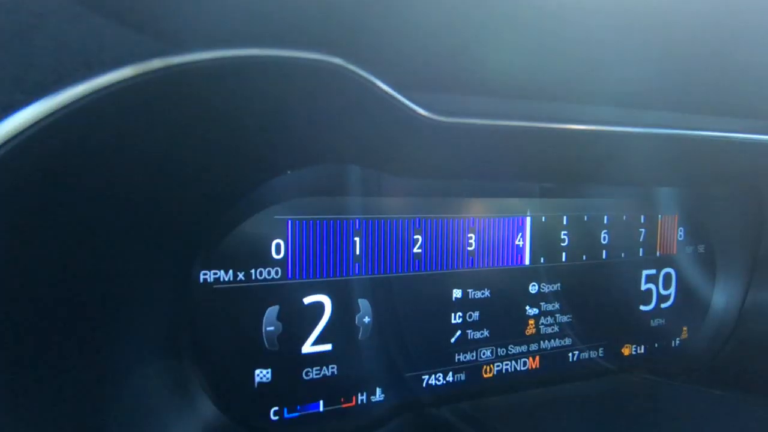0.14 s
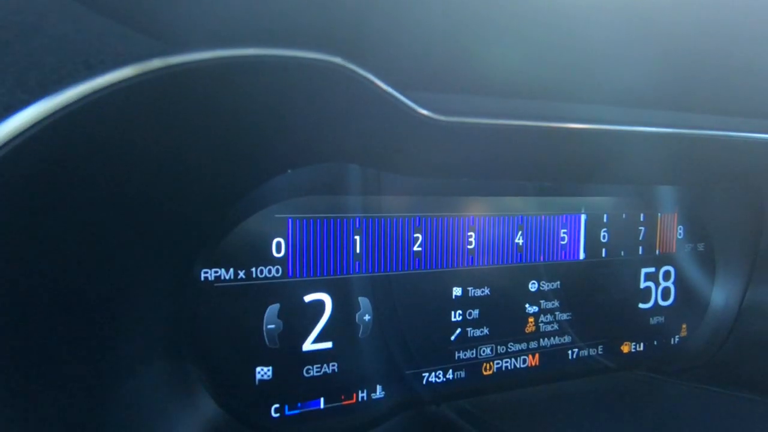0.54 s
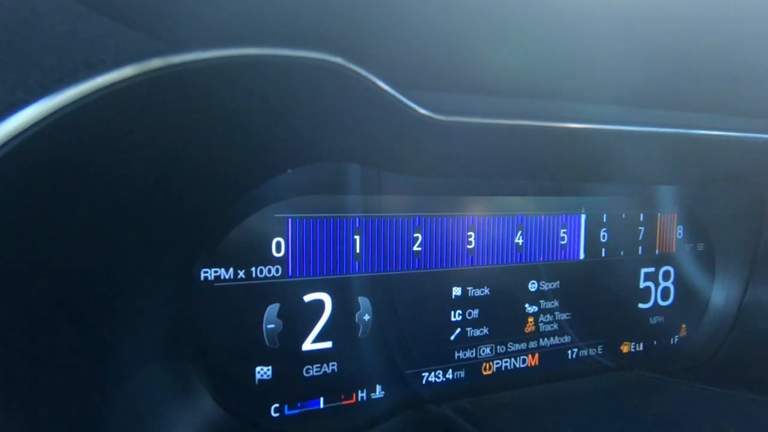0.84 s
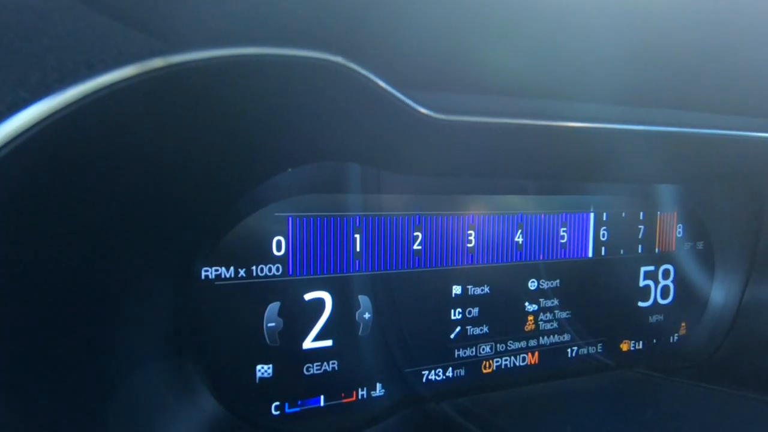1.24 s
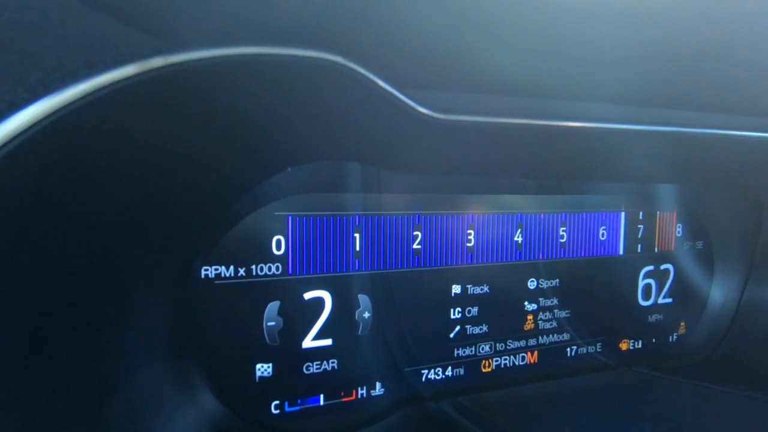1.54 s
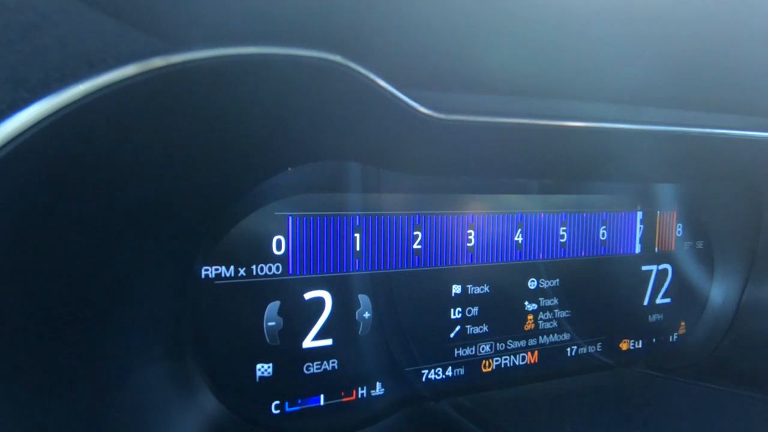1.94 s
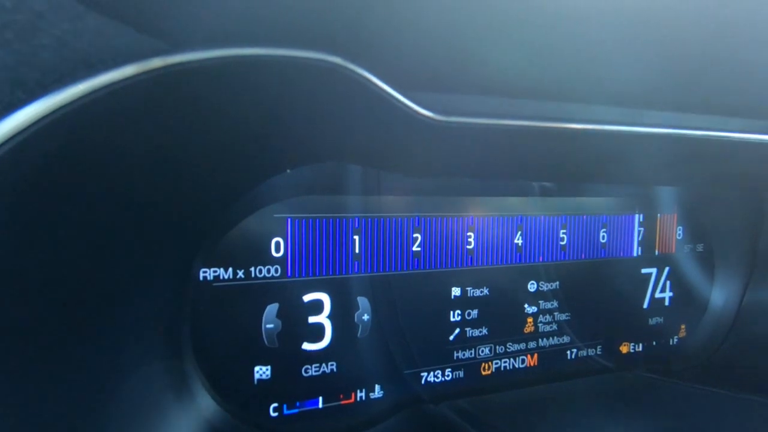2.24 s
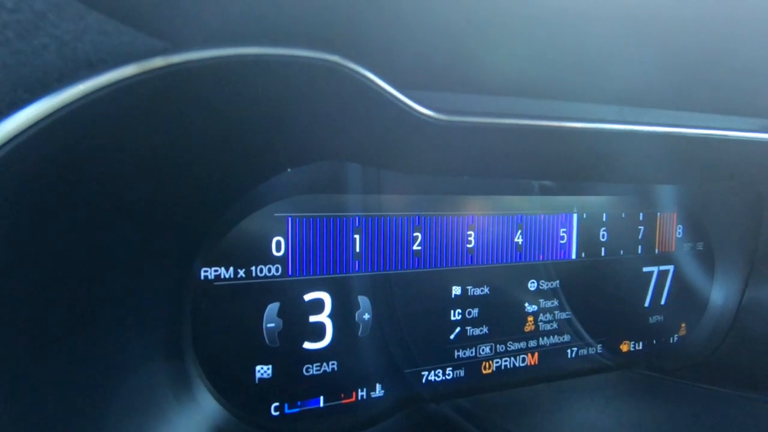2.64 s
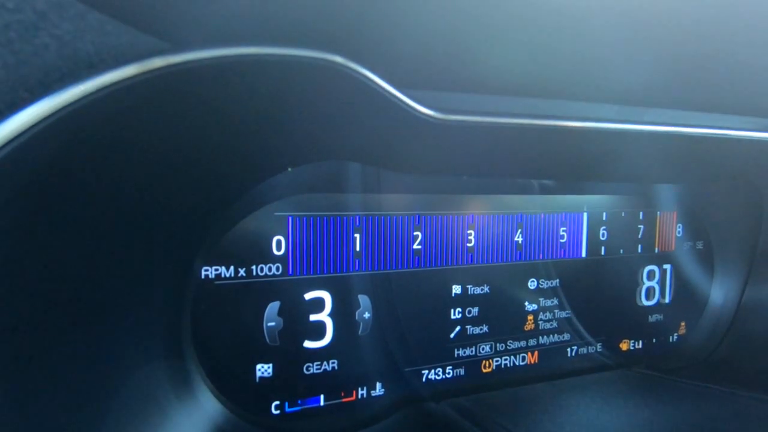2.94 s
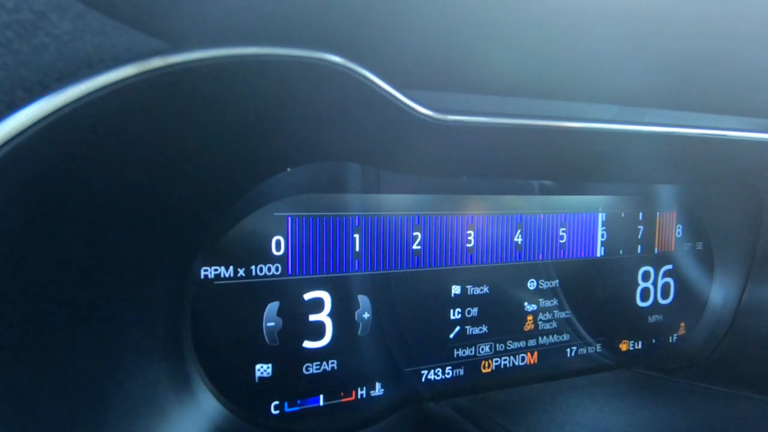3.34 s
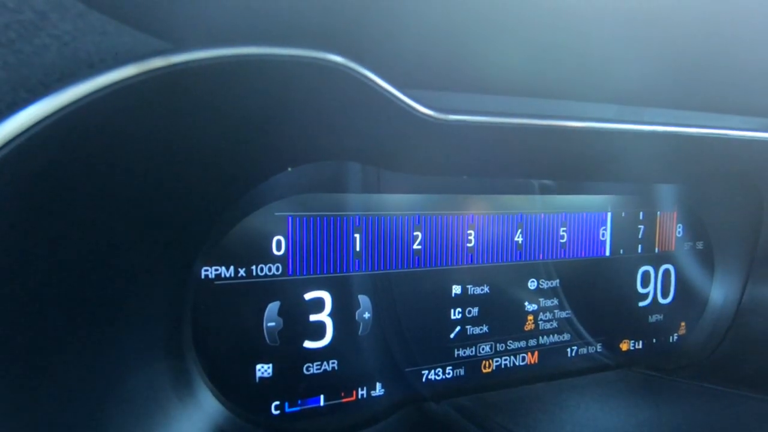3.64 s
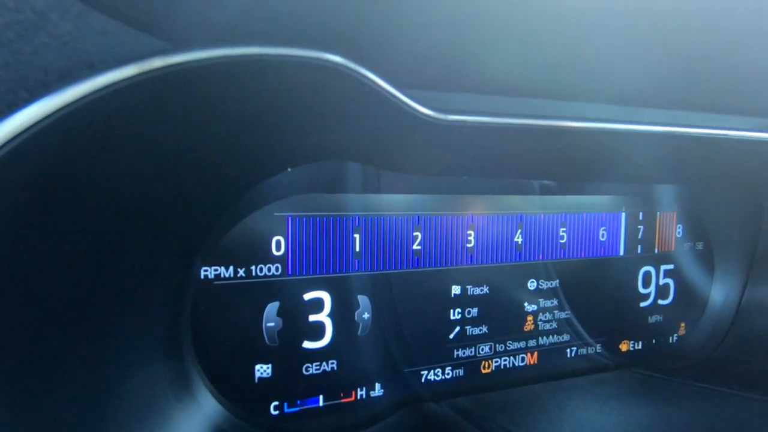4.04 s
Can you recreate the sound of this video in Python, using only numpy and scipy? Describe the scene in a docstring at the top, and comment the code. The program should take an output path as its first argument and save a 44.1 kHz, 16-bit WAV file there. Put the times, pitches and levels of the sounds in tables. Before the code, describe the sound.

A loud supercharged V8 is heard from inside the cabin of a moving car. It opens with a quick, ragged downshift blip, with a low bump and air thumps that overload the microphone. From about 0.3 seconds the engine eases to a softer, level drone. Around 0.8 seconds the throttle opens, and the deep, uneven exhaust note hardens and climbs, with a gassy rasp and a faint supercharger whine. It booms near 1.4 seconds and holds at its highest pitch from 1.6 to 2.1 seconds. At about 2.2 seconds a rough upshift drops the pitch. From 2.5 seconds the engine pulls again, slightly less raspy, rising slowly until the end just past 4 seconds. Tyre rumble and low buffeting air run underneath, with brief overload pops around 2, 2.5, 3.5 and 4 seconds.

```python
"""Inside a car's cabin, the microphone riding along with a supercharged V8: a downshift blip, a moment
on light throttle, a hard pull in second, an upshift, a pull in third. The uneven beat of the two
exhaust banks drones through the body, gas rasps with every pulse and the blower whines.
Road rumble and buffeting air lie underneath and drive the microphone into overload."""
import sys
import numpy as np
from scipy import signal
from scipy.fft import rfft, irfft
from scipy.io import wavfile
from scipy.ndimage import uniform_filter1d

SR = 44100
rng = np.random.default_rng(int(sys.argv[2]) if len(sys.argv) > 2 else 0)


def persist_wave(psi):
    """Save psi, clipped to +-1, as 16-bit WAV."""
    counts = np.round(np.clip(psi, -1, 1) * 32767).astype(np.int16)
    wavfile.write(sys.argv[1], SR, np.atleast_2d(counts).T)


N = 184368

# air buffets that pin the microphone: centre_s, length_s, depth (0-1)
MIC_BUFFETS = [(0.043, 0.021, 0.82), (0.084, 0.0082, 0.73), (1.906, 0.0026, 1), (2.171, 0.0048, .7),
               (2.49, .006, 0.62), (3.496, 0.0057, 0.8), (3.51, 0.0038, 1), (4.004, 0.0058, 0.56),
               (4.145, 0.0086, 0.94), (4.16, 0.0026, 0.98)]


def from_db(db):
    """Decibels to gain."""
    return 10 ** (np.asarray(db) / 20)


def rms_one(x):
    """Scale to unit power."""
    return x / np.sqrt(np.mean(x ** 2) + 1e-20)


def in_time(rows):
    """A curve of (time_s, value) points, sample by sample."""
    return np.interp(np.arange(N) / SR, *np.transpose(rows))


def swells(rows):
    """Each height column of (centre_s, length_s, heights...) events as a sum of smooth bumps."""
    t = np.arange(N) / SR
    return sum(np.outer(heights, np.exp(-(2 * (t - centre_s) / length_s) ** 2))
               for centre_s, length_s, *heights in rows)


def at_hz(spectrum, hz):
    """A spectrum's level in dB, interpolated on a log-frequency axis."""
    points_hz, levels_db = np.transpose(spectrum)
    return np.interp(np.log(hz), np.log(points_hz), levels_db)


def coloured(x, spectrum):
    """Give a signal a spectrum that falls steeply above its last point; unit power."""
    hz = np.maximum(np.arange(N // 2 + 1) * SR / N, 1)
    skirt = np.minimum(1, spectrum[-1][0] / hz) ** 4
    return rms_one(irfft(rfft(x) * from_db(at_hz(spectrum, hz)) * skirt, N))


def drift(rate_hz, hop=40):
    """A slow random wander with spread 1."""
    pole = np.exp(-2 * np.pi * rate_hz * hop / SR)
    noise = rng.standard_normal(N // hop + 2002)
    slow = signal.lfilter([1], [1, -2 * pole, pole * pole], noise)[2000:]
    return np.interp(np.arange(N) / hop, np.arange(len(slow)), rms_one(slow))


def order_tone(cycles, order, scatter=1):
    """One multiple of the cycle rate, its timing scattered by up to a share of its period."""
    return np.sin(2 * np.pi * (order * cycles + scatter * rng.random()))


def peak_db(hz, centre_hz, half_width_hz, boost_db):
    """What a resonance adds to a tone that passes through it."""
    return boost_db / (1 + np.square((hz - centre_hz) / half_width_hz))


def throttled(throttle, open_db, drop_db, bend):
    """Level of a layer as the throttle closes; the larger the bend, the longer it holds."""
    return open_db - drop_db * (1 - throttle) ** bend


def rumbling(spectrum):
    """Low noise whose slow swells are evened out."""
    noise = coloured(rng.standard_normal(N), spectrum)
    return noise / np.sqrt(uniform_filter1d(noise ** 2, size=6000))


def exhaust(cycles, cycle_hz, throttle, load, rough, sag_db, split_hz=340, pipe_lag_cycles=0.067):
    """The two banks through the body: a low drone and a higher bark, swelling at each resonance."""
    # the banks' uneven beat: order (multiple of the cycle rate), light_db, loaded_db
    bank_orders = [(1, -26.5, -34), (2, -36, -41), (3, -35.5, -35), (4, -41.5, -34.5), (5, -32.5, -40),
                   (6, -35, -37.5), (7, -54, -35), (8, -31, -34), (9, -39.5, -36.5), (10, -31, -33),
                   (11, -38.5, -39.5), (12, -41, -44.5), (13, -36.5, -44), (14, -33.5, -37),
                   (15, -32.5, -38), (16, -44.5, -40)]
    # pipe and cabin resonances: centre_hz, half_width_hz, boost_db
    resonances = [(116.7, 20.9, 18.5), (166.7, 15.2, 9), (252.7, 45.9, 18.5), (335.6, 33, 12.5),
                  (369, 13, -4.5), (421.7, 14.8, 8.5), (484.7, 19.6, 7.5), (531.4, 7.7, 7.5),
                  (579, 22, 6.5), (677, 37, 7), (786, 20, 7.5)]
    # one narrow resonance booms as the throttle comes wide open: centre_s, length_s, boost_db
    boom = [(1.4, 1, 15)]
    boom_db, = swells(boom)
    drone_db = throttled(throttle, open_db=1.46, drop_db=11.5, bend=4.3) + sag_db
    bark_db = throttled(throttle, open_db=0.08, drop_db=12.5, bend=2.25)
    out = 0
    for order, light_db, loaded_db in bank_orders:
        hz = order * cycle_hz
        low = 1 / (1 + (hz / split_hz) ** 12)
        level_db = (1 - load) * light_db + load * loaded_db + low * drone_db + (1 - low) * bark_db
        body_db = sum(peak_db(hz, *row) for row in resonances)
        body_db += peak_db(hz, centre_hz=404.5, half_width_hz=5.3, boost_db=boom_db)
        # the pipes smear each beat: every order arrives later than the one below
        timing = cycles - pipe_lag_cycles * order
        # uneven combustion shakes each order in timing and strength
        timing += 0.076 * rough * drift(13) / order
        uneven_db = 4 * rough * drift(11.8) + load * drift(2.7)
        out += from_db(level_db + body_db + uneven_db) * order_tone(timing, order, scatter=0.36)
    return np.sqrt(2) * out


def pulse_edge(cycles, cycle_hz, throttle, load, trim_db, uneven_db=4.5):
    """The sharp fronts of the exhaust pulses add weak, restless upper orders."""
    # their spectrum on light throttle and under load: frequency_hz, relative_db
    light_spectrum = [(700, 3.5), (900, 2.5), (1020, -11.5), (1110, 3), (1190, -23.5), (1300, -5),
                      (1480, -15.5), (1650, -11), (1900, -18), (2010, -14), (2130, -15.5), (3000, -30)]
    loaded_spectrum = [(650, 0.5), (810, 8), (960, -4.5), (1150, -6), (1300, -1.5), (1480, -10.5),
                       (2100, -18), (3600, -31)]
    out = 0
    for order in range(17, 58):
        hz = order * cycle_hz
        level_db = (1 - load) * at_hz(light_spectrum, hz) + load * at_hz(loaded_spectrum, hz)
        smear = 0.048 * load * drift(25) / order   # hard firing blurs the tones
        out += from_db(level_db + uneven_db * drift(2.93)) * order_tone(cycles + smear, order)
    edge_db = throttled(throttle, open_db=-26, drop_db=16, bend=1.1) + trim_db - 2.5 * load
    return from_db(edge_db) * rms_one(out)


def turbulence(pulses, spectrum, depth):
    """Gas noise that swells on each pressure peak."""
    return coloured(rng.standard_normal(N) * np.exp(depth * np.tanh(pulses)), spectrum)


def exhaust_gas(pipes, throttle, rough, treble_db):
    """Gas rushes out with every pulse: a low roar, a rasp above it and a hiss on top."""
    # the three noise colours: frequency_hz, relative_db
    roar_spectrum = [(70, -26), (110, -3), (250, 0), (450, -5), (650, -10), (850, -15), (1050, -18),
                     (1400, -23.5)]
    rasp_spectrum = [(600, -14), (900, 2.5), (1300, 1), (1600, -4.5), (2200, -4.5), (3200, -9),
                     (4200, -16.5), (6000, -44.5)]
    hiss_spectrum = [(2500, 0), (4000, 1), (6000, -3.5), (8000, -7), (9500, -9.5), (11000, -15),
                     (13000, -20.5), (15500, -26)]
    pulses = pipes / np.sqrt(uniform_filter1d(pipes ** 2, size=4410))
    roar_db = throttled(throttle, open_db=-25.5, drop_db=13, bend=4.8) + 7.3 * rough
    rasp_db = throttled(throttle, open_db=-33.5, drop_db=21.5, bend=1.13) + treble_db
    hiss_db = throttled(throttle, open_db=-41.5, drop_db=23.5, bend=1.28) + treble_db
    roar = from_db(roar_db) * turbulence(pulses, roar_spectrum, depth=0.79)
    rasp = from_db(rasp_db) * turbulence(pulses, rasp_spectrum, depth=0.64)
    hiss = from_db(hiss_db) * turbulence(pulses, hiss_spectrum, depth=0.22)
    return roar + rasp + hiss


def blower(cycles, cycle_hz, load, order=18.55, octave_db=-5, flutter_db=3):
    """Belt-driven rotor lobes chop the intake air into a whine that grows with load and speed."""
    level_db = -46 - 14.5 * (1 - load) + 15 * np.log2(cycle_hz / 50)
    intake_db = peak_db(order * cycle_hz, centre_hz=1008, half_width_hz=9.6, boost_db=13.5)
    # the intake resonance builds up only where the speed dwells on it
    flare_db = uniform_filter1d(intake_db, size=6000)
    whine = order_tone(cycles, order) + from_db(octave_db) * order_tone(cycles, 2 * order)
    return np.sqrt(2) * from_db(level_db + flare_db + flutter_db * drift(15)) * whine


def road_and_air(throttle, air_db=-21.5, rise_db_per_s=0.9):
    """Tyre rumble, growing with the drive and as the car gathers speed, and air at the microphone."""
    # the two noise colours: frequency_hz, relative_db
    tyre_spectrum = [(22, -6), (35, -13.5), (58, 0.5), (78, -7.5), (130, -18.5)]
    air_spectrum = [(4, -6), (8, 2.5), (20, 19.5), (32, 25), (42, -15.5)]
    # bumps, gusts and lulls: centre_s, length_s, bump_db, gust_db
    jolts = [(.03, 0.17, 17.5, 16.5), (.2, 0.25, -9, 1), (.37, 0.13, 9.5, 9), (.55, 0.56, 0, 1),
             (1.25, 0.37, 2.5, -2), (2.05, 0.39, 0, 5), (2.9, 0.69, 0, -3.5), (3.45, 0.31, -1, 7),
             (4.16, 0.66, 6, 3.5)]
    bump_db, gust_db = swells(jolts)
    tyres_db = throttled(throttle, open_db=-24.5, drop_db=1, bend=0.76)
    tyres_db += rise_db_per_s * np.arange(N) / SR
    tyres = from_db(tyres_db + bump_db) * rumbling(tyre_spectrum)
    air = from_db(air_db + gust_db) * rumbling(air_spectrum)
    return tyres + air


def scene(load_from=0.79, duck_db=4.5, duck_s=0.07, upshift_s=2.26, settle_s=0.22):
    """Speed and throttle drive every engine layer; road and air join them in the cabin."""
    # engine speed in four-stroke cycles: time_s, cycle_hz
    engine_speed = [(0.0, 33.6), (0.06, 36.3), (0.13, 42.6), (0.16, 45.1), (0.17, 45.4), (0.37, 45.3),
                    (0.78, 45.6), (0.86, 46.1), (1.05, 46.2), (1.13, 47.5), (1.28, 50.5), (1.44, 54.7),
                    (1.51, 57.3), (1.56, 58.7), (1.8, 57.5), (2.07, 58.6), (2.08, 58.5), (2.18, 54.5),
                    (2.34, 44.6), (2.47, 43.2), (2.65, 45.2), (2.77, 45.5), (2.87, 46.6), (3.68, 52.3),
                    (3.74, 52.5), (3.91, 54.3), (4.02, 54.1), (4.18, 56.8)]
    # a blip, a lift, then the pedal goes down and stays there: time_s, throttle (0-1)
    pedal = [(.06, 0.59), (.12, 0.75), (.19, 0.78), (.29, 0.02), (.42, 0.13), (.54, 0.22), (.77, 0.44),
             (.92, 0.73), (1.08, 0.83), (1.25, 0.96)]
    # gear changes, with ragged firing and less drive: centre_s, length_s, roughness (0-1), drone_db
    gear_changes = [(.13, 0.2, 0.55, -4.5), (2.23, 0.31, 0.46, -1)]
    cycle_hz, throttle = in_time(engine_speed), np.clip(in_time(pedal), 0, 1)
    # above this throttle the engine pulls and its tone hardens
    load = np.clip((throttle - load_from) / (1 - load_from), 0, 1)
    shift_rough, shift_db = swells(gear_changes)
    pull_rough = (0.54 + 0.45 * np.log2(cycle_hz / 50)) * load
    rough = np.clip(pull_rough + shift_rough, 0, 1)
    # the drone sags around each buffet
    buffeted, = swells([(centre_s, duck_s, depth) for centre_s, _, depth in MIC_BUFFETS])
    # after the upshift the rasp and hiss settle lower, the pulse edge by half as much
    since_upshift_s = np.maximum(np.arange(N) / SR - upshift_s, 0)
    settled_db = -5 * (1 - np.exp(-since_upshift_s / settle_s))
    # no two firings are timed quite alike
    cycles = np.cumsum(cycle_hz) / SR + 0.0055 * rough * drift(68)
    pipes = exhaust(cycles, cycle_hz, throttle, load, rough, sag_db=shift_db - duck_db * buffeted)
    edge = pulse_edge(cycles, cycle_hz, throttle, load, trim_db=settled_db / 2)
    gas = exhaust_gas(pipes, throttle, rough, treble_db=settled_db)
    return (pipes + edge + gas + blower(cycles, cycle_hz, load) + road_and_air(throttle))[None]


def record(dry, ceiling=0.74, stop=0.35, fade_in_s=0.002, cutoff_hz=16300):
    """The cabin microphone rounds the peaks and sticks at its stop in each buffet; the top is cut."""
    t = np.arange(N) / SR
    out = dry / (1 + (dry / ceiling) ** 4) ** (1 / 4)
    out *= np.minimum(t / fade_in_s, 1)
    for centre_s, length_s, depth in MIC_BUFFETS:
        pinned = depth * np.exp(-(2 * (t - centre_s) / length_s) ** 4)
        out = (1 - pinned) * out + pinned * stop
    return signal.sosfilt(signal.cheby2(16, 60, cutoff_hz, fs=SR, output="sos"), out)


dry = scene()
out = record(dry)
persist_wave(out)
```